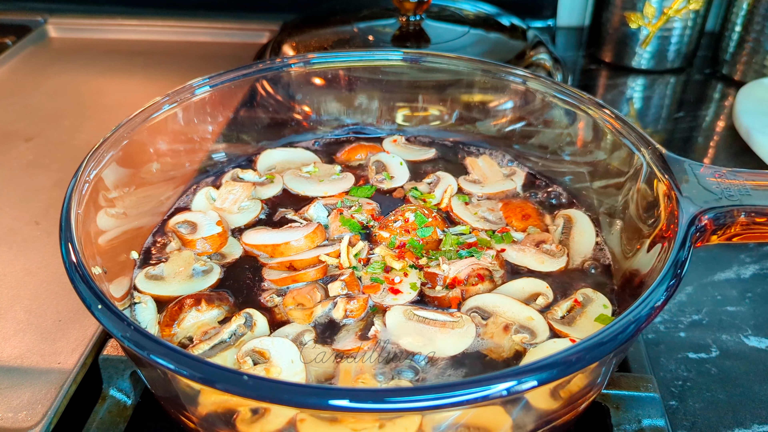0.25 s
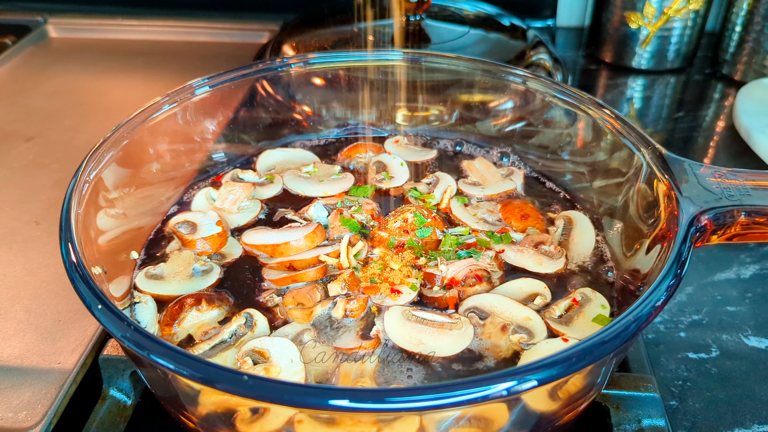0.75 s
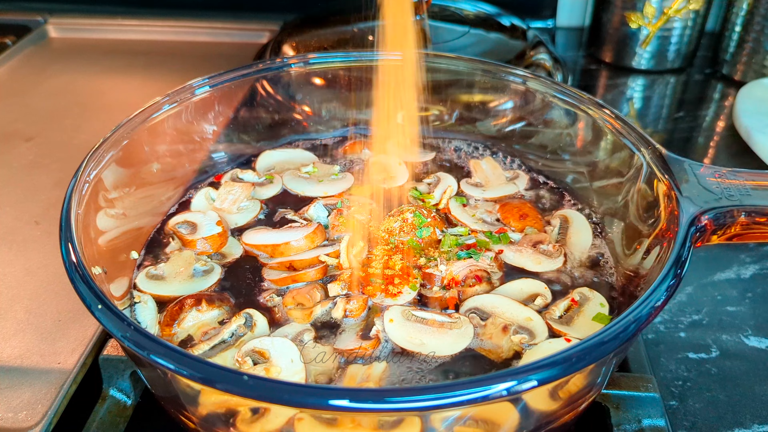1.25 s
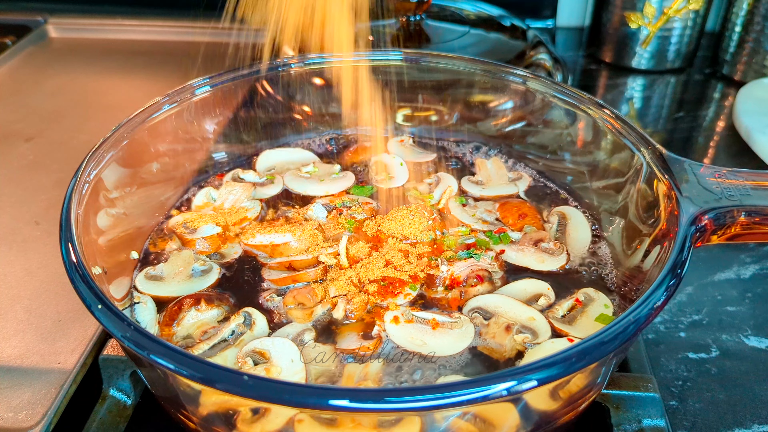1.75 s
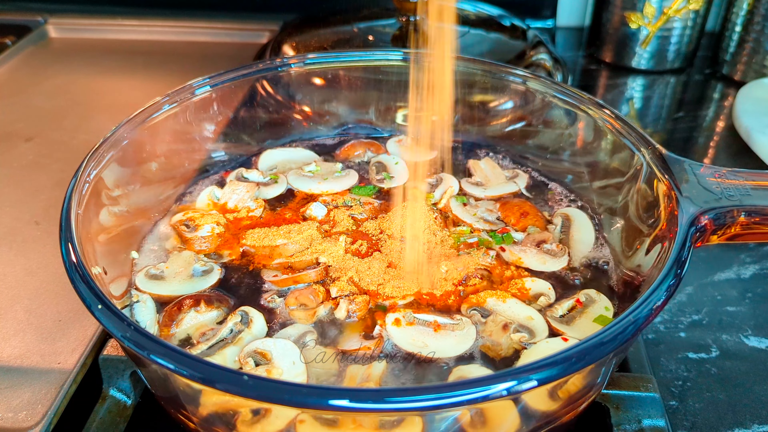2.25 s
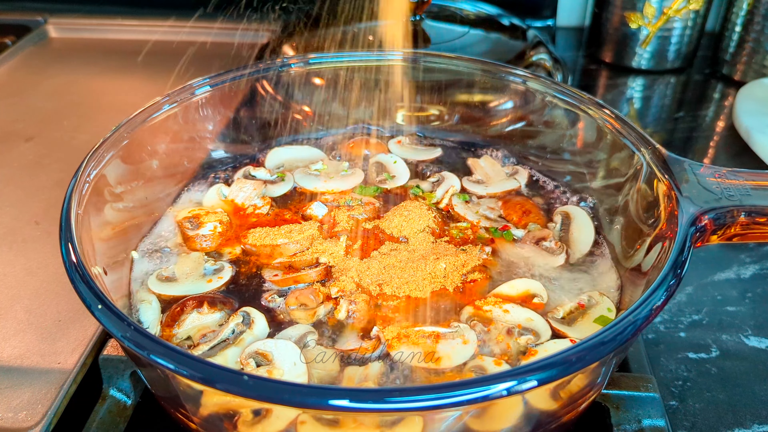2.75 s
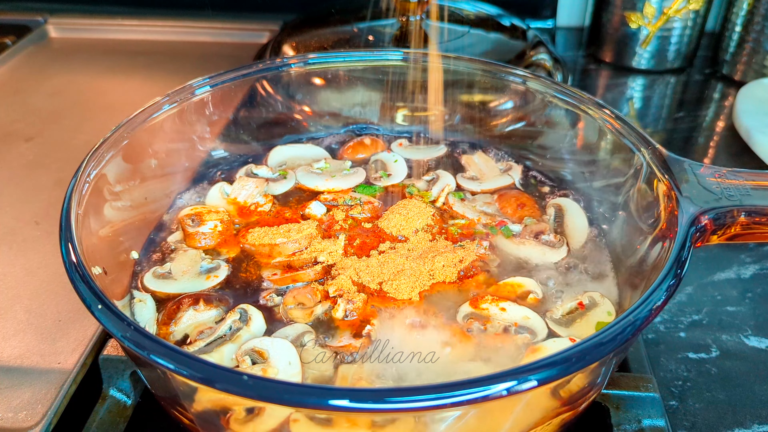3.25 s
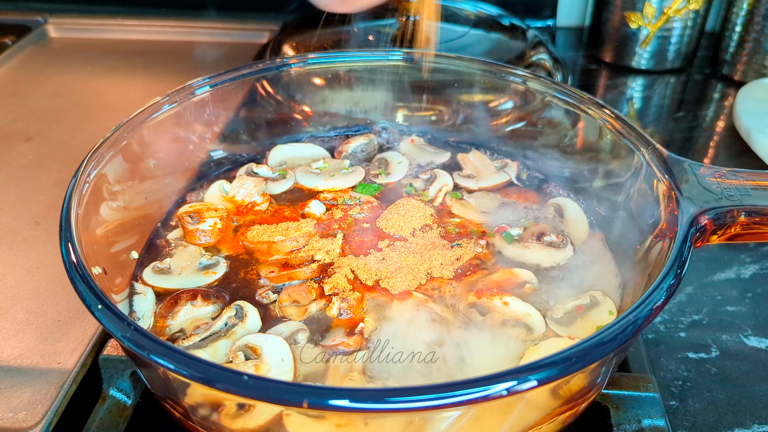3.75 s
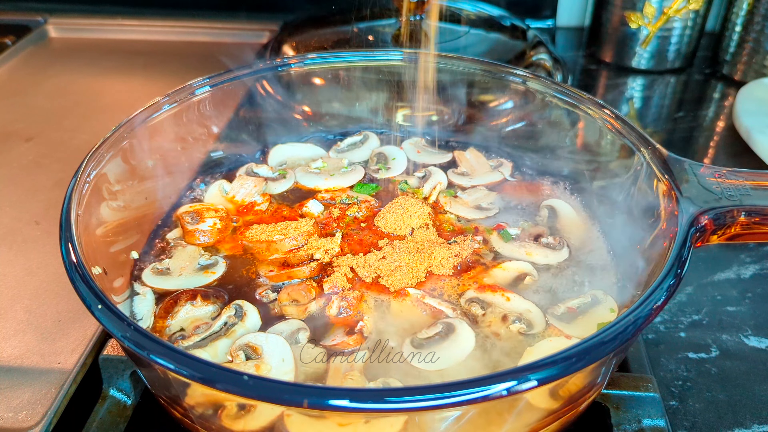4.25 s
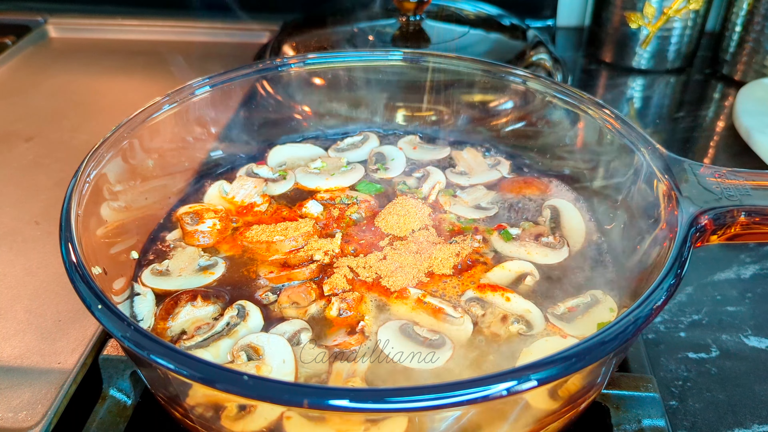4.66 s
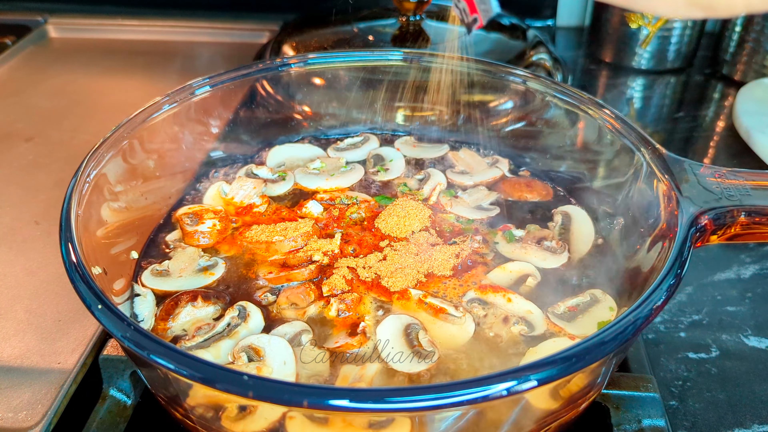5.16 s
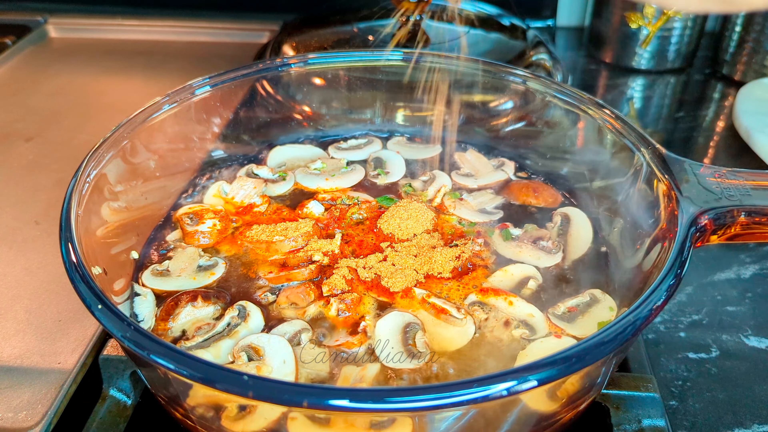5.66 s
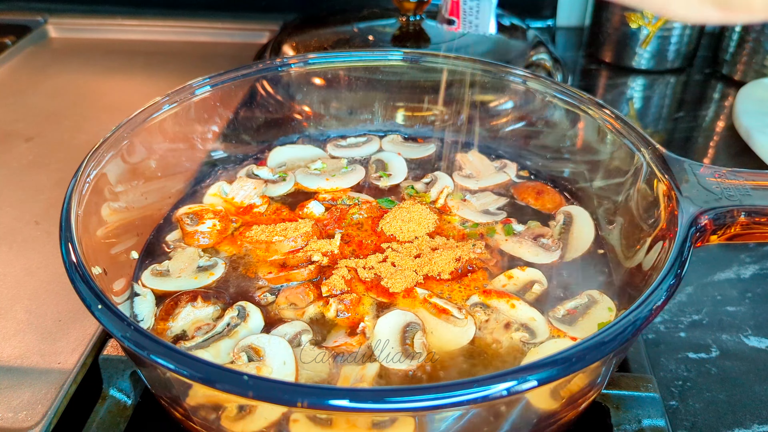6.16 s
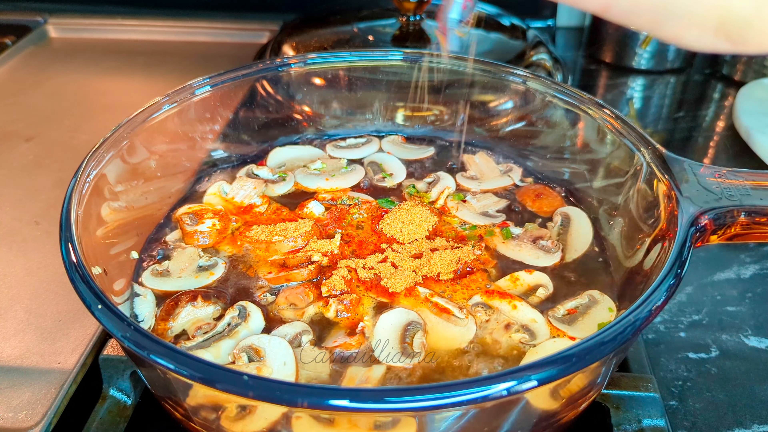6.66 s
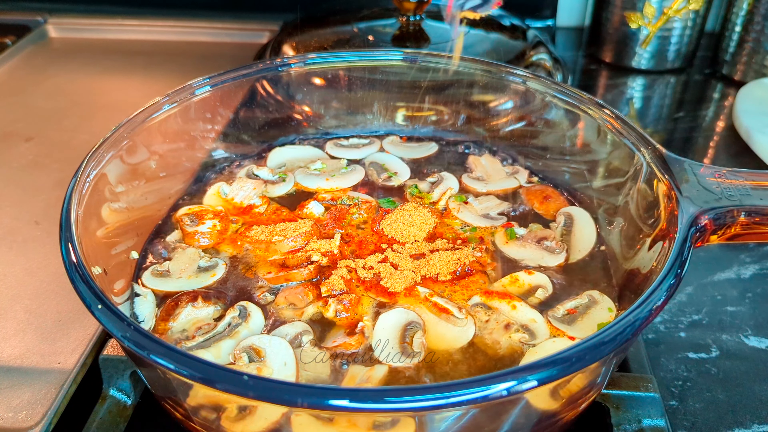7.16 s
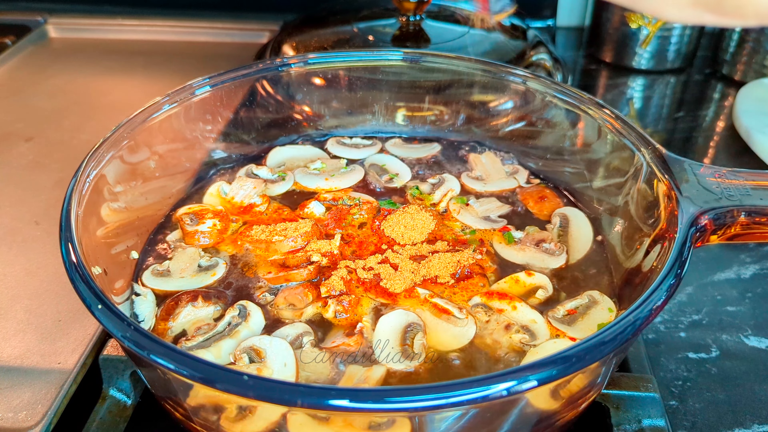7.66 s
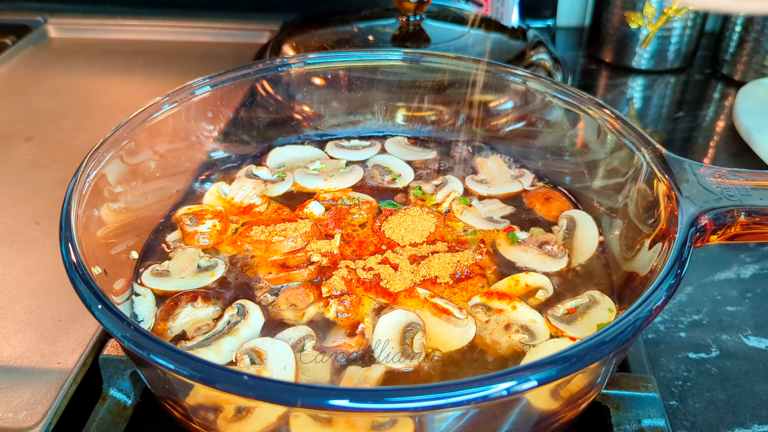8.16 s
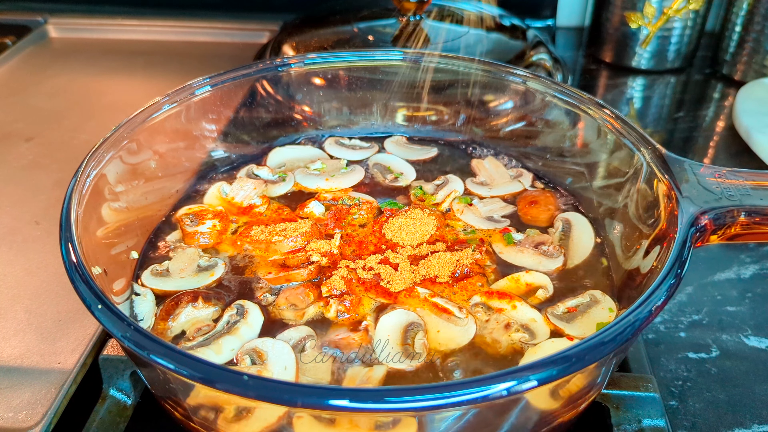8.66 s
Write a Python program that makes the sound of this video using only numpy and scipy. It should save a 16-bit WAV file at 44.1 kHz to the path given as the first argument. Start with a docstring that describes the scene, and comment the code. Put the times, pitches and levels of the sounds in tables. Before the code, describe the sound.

In a small, fairly dry kitchen, a foil seasoning sachet is worked close to a stereo microphone pair above a simmering glass pot. A low rumble and soft hiss of gas flame and broth run steadily throughout, rising only very slightly. From 0 to 2 s the foil gives faint, scattered snaps, with a small cluster around 0.5 to 0.8 s and isolated ticks after 1.2 s. From about 2 to 3 s strokes come faster, mixing crisp pops with short swarms of crinkles and sliding powder. Between 3 and 4 s it is sparser and softer. A sharp, loud snap at about 4.1 s begins the strongest part: bright, dense crackling, with hard snaps near 4.5, 4.8 and 5.1 s, a busy flurry around 5.3 to 5.5 s, slightly fewer snaps near 6 s, then almost continuous crumpling from 6.4 s until the end at about 8.9 s.

```python
"""A foil sachet over a simmering glass pot: scattered snaps at first, a busier run of strokes from about 2 s,
a sparser second from about 3 s, then loud, dense crackling from about 4 s to the end.
Creases buckle in single snaps and in swarms of ticks on each stroke, powder slides inside: kicks through
band-passes and resonators, trailed by scatter. Gas flame and broth hiss and rumble throughout: banded noise."""
import sys
import numpy as np
from scipy import signal
from scipy.fft import rfft, irfft, next_fast_len
from scipy.io import wavfile

SR = 44100
rng = np.random.default_rng(int(sys.argv[2]) if len(sys.argv) > 2 else 0)


def store_pcm(level_fs):
    """Save levels as 16-bit WAV."""
    pcm = np.round(np.clip(level_fs, -1, 1) * 32767).astype(np.int16)
    wavfile.write(sys.argv[1], SR, np.atleast_2d(pcm).T)


N = 392490

# Single snaps of the foil, faint to loud.
# Each row: time in seconds, level in dB before gain, tilt in dB per octave.
SNAP_EVENTS = [(0.1063, -46, 19.5), (0.1785, -31.5, -5.5), (0.201, -27.5, -1), (0.5182, -30, 6.5),
               (0.5599, -23, 6), (0.634, -32.5, -4.5), (0.7027, -28.5, 4.5), (0.76, -24.5, -2),
               (0.8028, -22.5, 4.5), (0.8142, -29.5, -6.5), (1.2199, -20.5, 0), (1.311, -29.5, 6),
               (1.4365, -26.5, 1.5), (1.592, -27.5, 0.5), (1.733, -25.5, 4), (1.784, -25, 0),
               (1.836, -24.5, 5), (1.901, -32, -7), (1.948, -30, -2.5), (2.068, -28, -2), (2.1164, -30, 0),
               (2.191, -26.5, -5.5), (2.343, -22, 0), (2.356, -32, -6.5), (2.42, -25, -1.5),
               (2.438, -28.5, -1), (2.524, -30.5, -1), (2.553, -30, 0), (2.643, -27.5, 6), (2.708, -31, 5),
               (2.738, -27.5, -11), (2.772, -23, -1.5), (2.861, -22.5, -4), (2.92, -25.5, -3),
               (2.934, -20, -1), (3.018, -24.5, -6), (3.09, -37, -5), (3.123, -38, -10.5), (3.289, -34, -5),
               (3.308, -37.5, 6), (3.456, -32.5, -0.5), (3.537, -25.5, -1), (3.728, -36, -7.5),
               (3.887, -28, -8), (3.904, -24.5, -1), (4.0772, -13, -0.5), (4.097, -28, 5),
               (4.2036, -32, 7.5), (4.238, -32, -3), (4.286, -28, 4.5), (4.315, -27, 5.5),
               (4.36, -28.5, 12), (4.5073, -15.5, 1.5), (4.5508, -23, 2.5), (4.632, -37, 15),
               (4.639, -34, 11.5), (4.668, -27, -7.5), (4.8153, -17, 1.5), (4.857, -28, 6),
               (4.921, -31.5, 7), (4.974, -29.5, -7.5), (4.993, -23.5, 3), (5.09, -24.5, 1),
               (5.11, -22.5, 1), (5.1261, -16.5, 2.5), (5.283, -28, 0), (5.294, -19, 4), (5.319, -28, -1),
               (5.39, -31.5, 5), (5.407, -28, -2.5), (5.4373, -21.5, 1.5), (5.459, -20, 2.5),
               (5.475, -27, 2), (5.494, -18, 3), (5.5134, -22.5, 6), (5.635, -23, 1), (5.686, -30, 0.5),
               (5.8096, -33.5, 6.5), (6.08, -49.5, 24.5), (6.095, -32.5, -9.5), (6.117, -32, 9),
               (6.163, -24, -1.5), (6.4526, -25.5, 2), (6.4939, -18.5, 1), (6.564, -20.5, -0.5),
               (6.578, -16.5, -1.5), (6.618, -34, 2), (6.6454, -21, 2), (6.656, -28, -2),
               (6.6751, -18.5, -1.5), (6.746, -28, 1), (6.7663, -18, -2), (6.888, -35, 10),
               (7.045, -39, -13.5), (7.1531, -20, 2.5), (7.173, -30, 5.5), (7.2059, -19, 2),
               (7.232, -20, 0.5), (7.2553, -27.5, 8), (7.314, -26, 0.5), (7.333, -28, -3),
               (7.3683, -20.5, -2.5), (7.4, -19.5, 0.5), (7.541, -24.5, 2.5), (7.658, -29, -1),
               (7.6896, -21.5, -1.5), (7.7253, -16, -2.5), (7.787, -18.5, -2.5), (7.887, -29, 3.5),
               (7.912, -20, 2), (7.9987, -23.5, 2.5), (8.028, -38, -10.5), (8.0631, -19, 0.5),
               (8.17, -24, -3.5), (8.3077, -19, 2), (8.334, -37.5, -10.5), (8.4832, -22, 2),
               (8.502, -18.5, -1.5), (8.6344, -21.5, -2), (8.6443, -18, 0.5)]
# Spectrum of the foil panels. Each row: frequency in Hz, relative density in dB per Hz.
FOIL_SPECTRUM = [(250, -26.5), (466, -10.5), (1460, -6), (2100, -1.5), (2950, -0.5), (4200, 0),
                 (5300, -0.5), (6500, 1.5), (11800, -0.5), (15500, -2.5)]
# Patch held tautest as the grip shifts. Each row: time in seconds, frequency in Hz.
TAUT_PATCH = [(0, 2320), (2.35, 2010), (2.5, 2820), (2.72, 1160), (3.9, 3770), (5.4, 2500), (6.1, 5850),
              (6.8, 2240), (7.2, 4100), (7.6, 2390), (8.1, 4640), (8.9, 3200)]
# Likeness of the two microphones. Each row: frequency in Hz, left-right correlation from -1 to 1.
LEFT_RIGHT_LIKENESS = [(60, 0.94), (240, 0.94), (950, 0.34), (3770, -0.49), (9000, -0.63)]


def strokes(rise=0.59, fall=0.51):
    """Level and tilt of the crinkling: crumples that set in fast and fade slower, above the quiet rustle."""
    # Foil crumpled by the hand. Each row: centre in seconds, length in seconds, level in dB.
    crumples = [(0.13, 0.01, -42.5), (0.568, 0.058, -47), (1.505, 0.013, -39), (1.9, 0.019, -40.5),
                (2.05, 0.01, -35), (2.29, 0.048, -39.5), (2.354, 0.016, -38), (2.43, 0.047, -40.5),
                (2.559, 0.015, -41.5), (2.628, 0.028, -42.5), (2.727, 0.015, -33.5), (2.857, 0.051, -44.5),
                (2.997, 0.049, -45), (3.105, 0.04, -46.5), (3.646, 0.017, -44), (3.889, 0.0094, -32.5),
                (4.279, 0.016, -42.5), (4.354, 0.031, -35), (4.491, 0.026, -41.5), (4.656, 0.041, -32.5),
                (4.81, 0.039, -41.5), (4.968, 0.019, -33), (5.132, 0.051, -42), (5.296, 0.028, -33.5),
                (5.503, 0.047, -37.5), (5.771, 0.023, -40.5), (5.82, 0.015, -36.5), (5.921, 0.016, -43),
                (6.1, 0.071, -41), (6.18, 0.03, -36), (6.322, 0.071, -37), (6.491, 0.045, -35.5),
                (6.65, 0.015, -37.5), (6.895, 0.017, -38.5), (7.051, 0.013, -36.5), (7.252, 0.034, -31),
                (7.406, 0.042, -37.5), (7.56, 0.032, -34.5), (7.716, 0.047, -35), (7.903, 0.05, -40),
                (8.084, 0.058, -42.5), (8.167, 0.029, -40.5), (8.323, 0.062, -37.5), (8.535, 0.056, -38),
                (8.643, 0.025, -35), (8.716, 0.019, -38), (8.865, 0.051, -38)]
    # Fingers never quite at rest. Each row: time in seconds, level in dB.
    rustle = [(0, -55), (.48, -58), (.6, -53.5), (1.0, -56.5), (1.83, -48), (2.2, -56), (2.6, -49.5),
              (3.5, -57), (3.86, -57), (3.92, -45), (5.55, -50), (6.03, -54.5), (6.44, -55.5), (6.62, -39),
              (7.1, -51), (7.3, -45.5), (8.25, -55.5), (8.9, -47.5)]
    settle_s, settle_db = 0.01, -22  # short, softer crumple left by each snap
    brightness_db_per_octave, dulling_db_per_octave = -1.09, 0.5

    settling = [(s + settle_s / 4, settle_s, level_db + settle_db) for s, level_db, _ in SNAP_EVENTS]
    centre_s, length_s, level_db = np.transpose(list(crumples) + settling)
    power = from_db(in_time(rustle)[0]) ** 2
    dulled = np.zeros(N)
    for centre, half, gain in zip(centre_s * SR, length_s * SR / 2, from_db(level_db)):
        at = np.arange(max(0, int(centre - 3 * half)), min(N, int(centre + 3 * half)))
        away = (at - centre) / half
        bell = gain ** 2 * np.exp(-np.where(away < 0, rise * away ** 4, fall * away ** 2))
        power[at] += bell
        # a crumple starts bright and ends dull
        dulled[at] += dulling_db_per_octave * np.clip(away, -1, 1) * bell
    return 10 * np.log10(power), brightness_db_per_octave - dulled / power


def snaps(gain_db):
    """Single snaps, each three close clicks, the middle one loudest: sample, level, tilt."""
    step_s, steps_db = 0.001, [-9, 0, -6]  # nominal spacing; level of each click
    s, level_db, tilt_db = np.transpose(SNAP_EVENTS)
    step = np.arange(-1, 2)
    s = s[:, None] + step_s * step * rng.uniform(0.6, 1.4, (len(s), 3))
    level_db = level_db[:, None] + gain_db + steps_db
    return (s.ravel() * SR).astype(int), level_db.ravel(), np.repeat(tilt_db, 3)


def crinkle(stroke, per_s, spread_db, clump_db, gain_db, varied_db, fades):
    """Swarm of clumped buckles, few large and many small, following the stroke: sample, level, tilt."""
    resting_db = -56.5  # stroke level below which the hand is nearly still
    level_db, tilt_db = stroke
    at = np.flatnonzero(rng.random(N) < per_s / SR)
    size_db = spread_db * np.minimum(rng.exponential(1, len(at)), 2.4)
    size_db += clump_db * drift(56, at)
    size_db -= 10 * np.log10(np.mean(from_db(size_db) ** 2) * per_s / SR)  # unit swarm power
    size_db += fades * np.minimum(level_db[at] - resting_db, 0)
    varied_tilt_db = varied_db * np.clip(rng.standard_normal(len(at)), -1, 2)
    return at, level_db[at] + size_db + gain_db, tilt_db[at] + varied_tilt_db


def sachet(buckles, uneven_db, shape_db, facing_db, near_db, far_db):
    """Each buckle shakes all panel sizes unequally, trailed by fresh scatter off near things and the room."""
    # Kitchen decay. Each row: frequency in Hz, t60 in seconds.
    kitchen = [(500, 0.15), (14000, 0.17)]
    near_t60_s = 0.006  # hand, pot and counter
    at, level_db, tilt_db = joined(buckles)
    out = np.zeros((2, N))
    white = rng.standard_normal((2, 2, N))
    # each buckle peaks near the taut patch, higher for bright creases
    own_hz = in_time(TAUT_PATCH)[0][at] * from_db(tilt_db + 2.5 * rng.standard_normal(len(at)))
    own_hz = np.clip(own_hz, 1100, 8000)
    pops_out = rng.choice([-1, 1], len(at))  # flip direction, common to all panels
    for k, (hz, sos) in enumerate(bands(251.7, count=18)):
        shared = rng.standard_normal(len(at))
        facing = rng.standard_normal((2, len(at)))
        colour_db = at_hz(FOIL_SPECTRUM, hz) + tilt(tilt_db, hz)
        colour_db += uneven_db * shared
        colour_db += shape_db * drift(112, at)  # the bending sachet favours other panels
        colour_db += 7 * np.exp(-(np.log2(hz / own_hz) / 0.45) ** 2)

        kicks = np.full((2, N), 1e-18)
        # earlier kicks in low bands make up for the slower filters, so bands peak together
        early = np.maximum(at - int(1.2 * SR / hz), 0)
        # band signs alternate
        kicks[:, early] = from_db(level_db + colour_db + facing_db * facing) * pops_out * (-1) ** k
        power = np.mean(kicks ** 2, axis=0)
        scattered = dying(power, near_db, near_t60_s) + dying(power, far_db, at_hz(kitchen, hz))
        scatter = stereo(white[k % 2], hz) / np.sqrt(2)
        out += sides(hz) * signal.sosfilt(sos, kicks + np.sqrt(scattered) * scatter)
    return out


def ringing(buckles, ring_db, tension_db, t60_cycles):
    """Taut patches of foil ring briefly; which are taut changes as the hand bends the sachet."""
    # Patches that ring: frequencies in Hz.
    patches_hz = [660, 1190, 1600, 1940, 2350, 2900, 3300, 3800, 4200, 6200, 7500, 8900, 11400]
    taut_db, taut_octaves = 1.5, 0.2  # lift of the tautest patch and its reach
    at, level_db, tilt_db = joined(buckles)
    out = np.zeros((2, N))
    taut_hz = in_time(TAUT_PATCH)[0][at]
    for hz in patches_hz:
        r = from_db(-60 * hz / (t60_cycles * SR))
        w = 2 * np.pi * hz / SR
        colour_db = at_hz(FOIL_SPECTRUM, hz) + tilt(tilt_db, hz)
        colour_db += tension_db * np.minimum(drift(18, at), 1.5)
        colour_db += taut_db * np.exp(-(np.log2(hz / taut_hz) / taut_octaves) ** 2)
        kicks = np.full(N, 1e-18)
        kicks[at] = from_db(level_db + colour_db + ring_db) * rng.standard_normal(len(at))
        rung = signal.lfilter([(1 - r) / 2, 0, (r - 1) / 2], [1, -2 * r * np.cos(w), r * r], kicks)
        out += rung * from_db(rng.normal(0, 2, (2, 1)))  # a patch faces one microphone more
    return out


def stove(patchy_db):
    """Flame and broth: bands of stereo noise, alike in the bass, each flickering a little."""
    # Flame and broth. Each row: frequency in Hz, relative density in dB per Hz.
    spectrum = [(20, -36), (69, -7.5), (124, -3.5), (165, -12.5), (230, -15.5), (305, -11), (460, -13),
                (640, -8.5), (820, -12), (1050, -19), (2900, -14.5), (5200, -18.5), (6900, -12),
                (8800, -16), (15500, -13)]
    # Each row: time in seconds, level in dB.
    level = [(0, -53.5), (8.9, -51)]
    out = 0
    white = rng.standard_normal((2, 2, N))
    for k, (hz, sos) in enumerate(bands(24.97, count=28)):
        noise = signal.sosfilt(sos, white[k % 2])
        gain = from_db(at_hz(spectrum, hz) + patchy_db * drift(6.4, np.arange(N)))
        out = out + gain * sides(hz) * stereo(noise, hz)
    return from_db(in_time(level)[0]) * rms_one(out)


def from_db(db):
    """Decibels to gain."""
    return 10 ** (np.asarray(db) / 20)


def rms_one(x):
    """Scale to rms 1."""
    return x / np.sqrt(np.mean(x ** 2) + 1e-20)


def in_time(rows):
    """Columns of a curve, one value per sample."""
    s, *columns = np.transpose(rows)
    return [np.interp(np.arange(N) / SR, s, c) for c in columns]


def at_hz(points, hz):
    """Read a table on a log-frequency axis."""
    table_hz, value = np.transpose(points)
    return np.interp(np.log(hz), np.log(table_hz + 1), value)


def drift(rate_hz, at):
    """Slow random curve of rms 1 from a double one-pole low-pass, read at the given samples."""
    r = np.exp(-80 * np.pi * rate_hz / SR)  # runs at SR / 40
    white = rng.standard_normal(N // 40 + 2002)
    slow = signal.lfilter([1], [1, -2 * r, r * r], white)[2000:]
    return np.interp(at / 40, np.arange(len(slow)), rms_one(slow))


def bands(low_hz, count):
    """Third-octave band-passes upward: centre and filter."""
    edges = np.minimum(low_hz * 2 ** (np.arange(count + 1) / 3), 0.45 * SR)
    return [(np.sqrt(a * b), signal.butter(2, [a, b], "band", fs=SR, output="sos"))
            for a, b in zip(edges, edges[1:])]


def tilt(db_per_octave, hz):
    """Brightness of a buckle, turning about 4 kHz and levelling off at both ends."""
    return db_per_octave * np.log2(np.clip(hz, 900, 11000) / 4000)


def dying(power, share_db, t60_s):
    """A share of the energy of each kick, spread over an exponential decay."""
    r = from_db(-60 / (t60_s * SR)) ** 2
    return signal.lfilter([0, from_db(share_db) ** 2 * (1 - r)], [1, -r], power)


def joined(buckles):
    """Samples, levels and tilts of several buckle groups, end to end."""
    return [np.concatenate(c) for c in zip(*buckles)]


def stereo(noise, hz):
    """Mix two noises as mid and side to the left-right likeness at this frequency."""
    mid, side = noise
    alike = np.clip(at_hz(LEFT_RIGHT_LIKENESS, hz), -1, 1)
    return np.sqrt(1 + alike) * mid + np.sqrt(1 - alike) * side * [[1], [-1]]


def sides(hz):
    """Gains of the left and right microphone."""
    # Each row: frequency in Hz, left minus right in dB.
    balance = [(60, -2), (240, -1), (950, -2), (3770, -0.5), (15000, 1.5)]
    return from_db(at_hz(balance, hz) * np.array([[0.5], [-0.5]]))


def delayed(x, lag_s):
    """Shift by any fraction of a sample, as a phase slope."""
    size = next_fast_len(N + 64)
    cycles_per_sample = np.arange(size // 2 + 1) / size
    turned = rfft(x, size) * np.exp(-2j * np.pi * cycles_per_sample * lag_s * SR)
    return irfft(turned, size)[..., :N]


def scene():
    """Sachet over the stove, a little nearer the left microphone."""
    stroke = strokes()
    ticks = crinkle(stroke, per_s=330, spread_db=4.5, clump_db=2.5, gain_db=-8.0, varied_db=4.0, fades=0.4)
    powder = crinkle(stroke, per_s=3000, spread_db=0.5, clump_db=0.0, gain_db=-8.0, varied_db=1.0, fades=0.038)
    creases = crinkle(stroke, per_s=90, spread_db=0.0, clump_db=0.5, gain_db=-11.5, varied_db=4.0, fades=0.58)
    buckles = [powder, creases, ticks, snaps(gain_db=6.5)]
    foil = sachet(buckles, uneven_db=2.0, shape_db=2.0, facing_db=2.0, near_db=0.0, far_db=-5.0)
    # powder does not ring
    left, right = foil + ringing(buckles[1:], ring_db=10.5, tension_db=6.0, t60_cycles=137.0)
    return np.array([left, delayed(right, lag_s=0.00005)]) + stove(patchy_db=1.2)


def record(dry):
    """The top is cut steeply by a Chebyshev low-pass."""
    cutoff_hz = 15800 * 1.012  # stopband edge
    return signal.sosfilt(signal.cheby2(20, 55, cutoff_hz, fs=SR, output="sos"), dry)


dry = scene()
out = record(dry)
store_pcm(out)
```